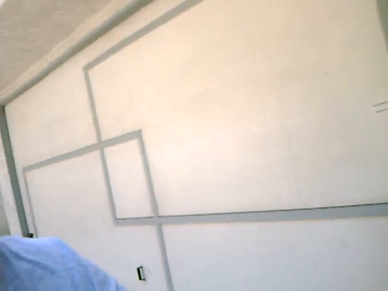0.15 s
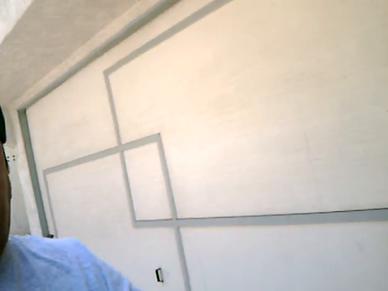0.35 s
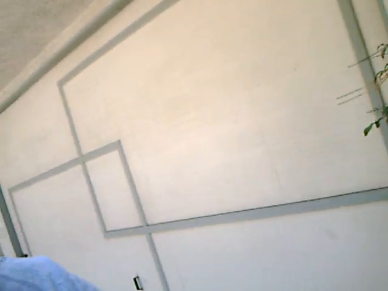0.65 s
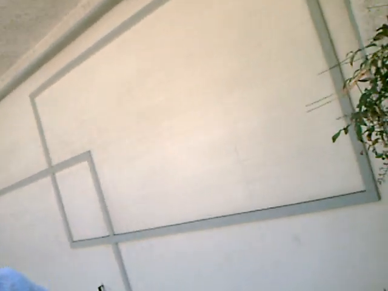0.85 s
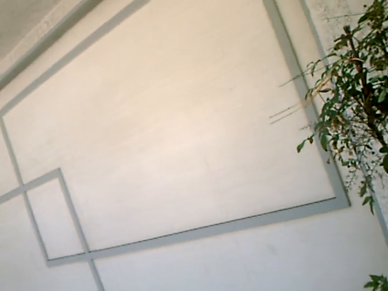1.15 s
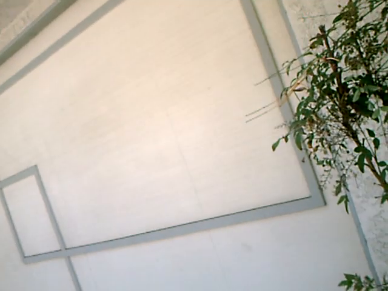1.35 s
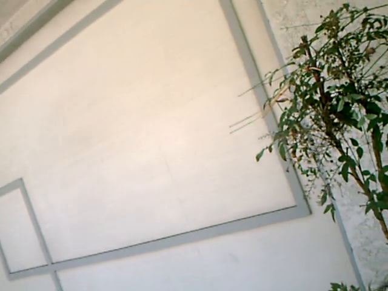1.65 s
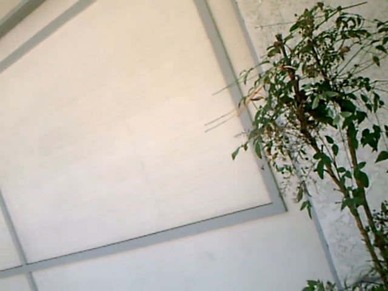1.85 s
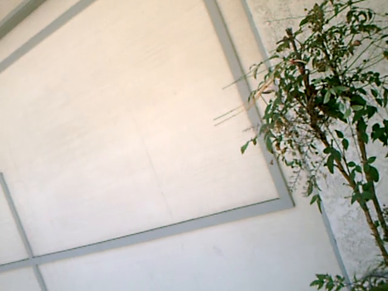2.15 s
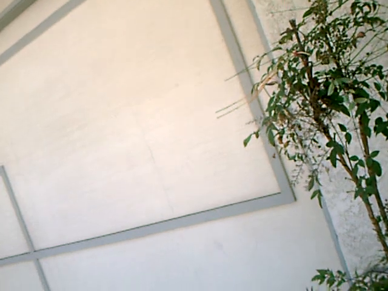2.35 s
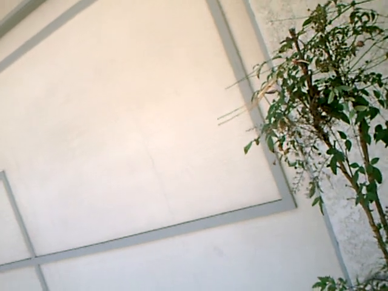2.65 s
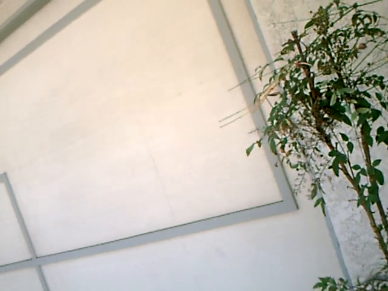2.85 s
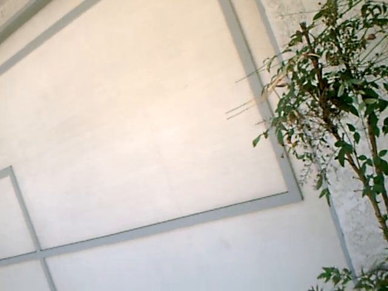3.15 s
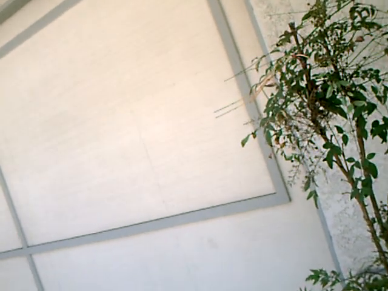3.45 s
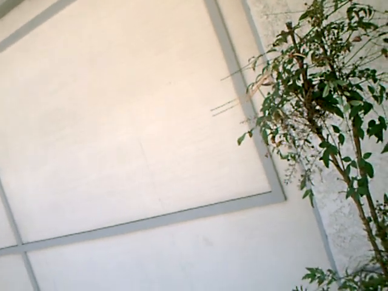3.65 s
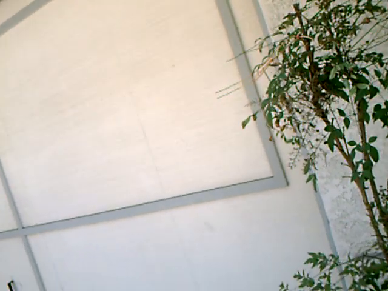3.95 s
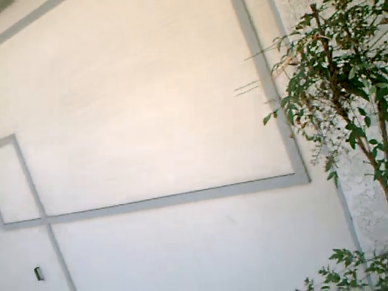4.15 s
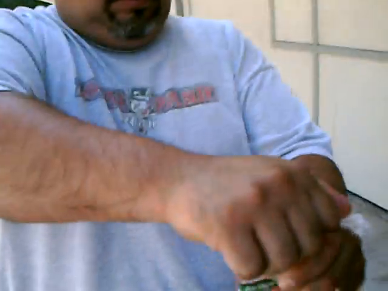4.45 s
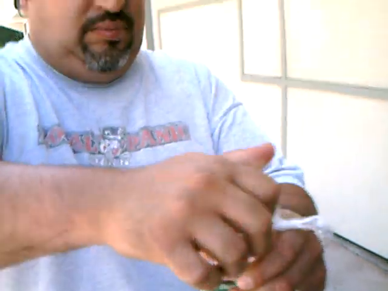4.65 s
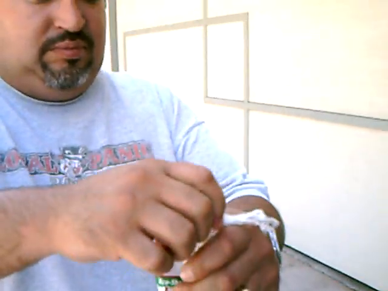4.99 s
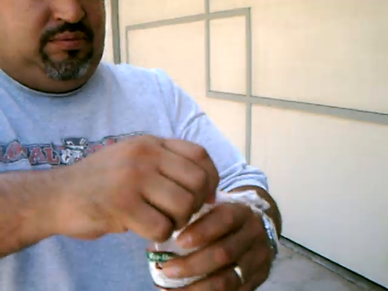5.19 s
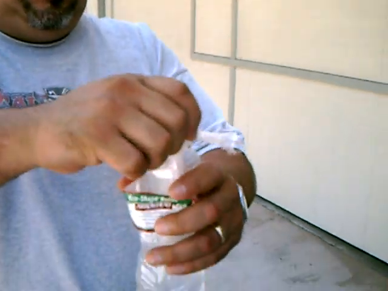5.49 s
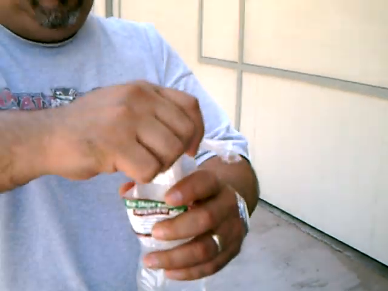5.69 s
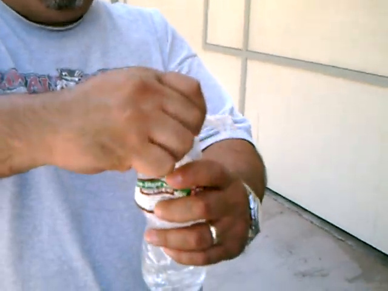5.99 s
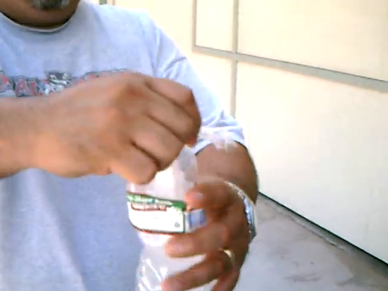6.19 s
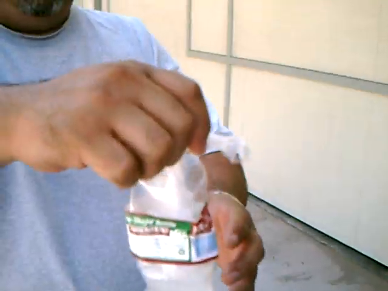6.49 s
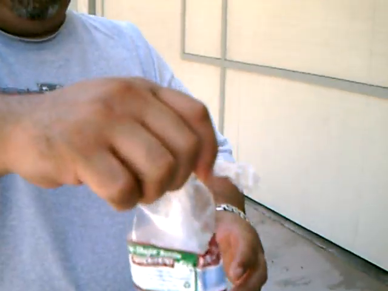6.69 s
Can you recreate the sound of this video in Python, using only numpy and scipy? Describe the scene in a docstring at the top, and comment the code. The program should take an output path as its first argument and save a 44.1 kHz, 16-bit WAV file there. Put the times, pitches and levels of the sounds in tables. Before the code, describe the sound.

Outdoors, over a steady low rumble, a thin plastic water bottle gives a hollow pop almost at once, close to the microphone. Hands squeeze it and twist the cap over plastic wrap, making irregular clusters of pops and bright snaps, some ringing briefly, while the wrap rubs faintly. The snaps thin out later, with pauses between them. Nearby walls add a short echo, and the loudest snaps overload the small microphone.

```python
"""A low outdoor rumble, and almost at once the hollow pop of a thin plastic water bottle, close to the
microphone. The bottle is squeezed and twisted shut over plastic wrap: wall panels buckle, creases snap
brightly, short tones ring on after a snap or knock, and the wrap rubs under the fingers. The ground and
a house front echo each snap, and the loudest snaps overload the small camera's microphone."""
import sys
import numpy as np
from scipy import signal
from scipy.fft import rfft, irfft
from scipy.io import wavfile
from scipy.ndimage import uniform_filter1d

SR = 44100
rng = np.random.default_rng(int(sys.argv[2]) if len(sys.argv) > 2 else 0)


def to_wav(s):
    """Save 16-bit WAV."""
    ch = np.atleast_2d(s).T  # columns
    pcm = np.round(np.clip(ch, -1, 1) * 32767)  # PCM
    wavfile.write(sys.argv[1], SR, pcm.astype(np.int16))


N = 301203
TIME = np.arange(N) / SR
SNAP_TIME = TIME[:1024]


def undb(db):
    """Decibels to gain."""
    return 10 ** (np.asarray(db) / 20)


def level(x, db):
    """Scale to an rms level."""
    return x * undb(db) / np.sqrt(np.mean(x ** 2))


def burst_level(x, db):
    """Scale a short sound so that its energy equals 1 ms at this level."""
    return x * undb(db) * np.sqrt(SR / 1000 / np.sum(x ** 2))


def add(out, start_s, x):
    """Mix x into out from start_s on."""
    i = max(int(start_s * SR), 0)
    out[i:i + len(x)] += x[:len(out) - i]


def butter(order, hz, kind="low"):
    """Sections of a Butterworth filter."""
    return signal.butter(order, hz, kind, fs=SR, output="sos")


def resonate(x, hz, width_hz):
    """One resonance, gain 1 at its centre."""
    return signal.lfilter(*signal.iirpeak(hz, hz / width_hz, fs=SR), x)


def colour(x, points):
    """Shape a sound by a spectrum of (Hz, dB) points."""
    hz, db = np.transpose(points)
    bin_hz = np.arange(len(x) // 2 + 1) * SR / len(x)
    gain = undb(np.interp(np.log(bin_hz + 1), np.log(hz), db))
    return irfft(rfft(x) * gain, len(x))


def drift(rate_hz):
    """Smooth random wandering with an rms of 1."""
    hold = int(SR / rate_hz)
    steps = np.repeat(rng.standard_normal(N // hold + 1), hold)[:N]
    return level(uniform_filter1d(uniform_filter1d(steps, hold), hold), 0)


# The open air around the microphone. Each row: frequency in Hz, relative level in dB.
AIR_SPECTRUM = [(13, -37), (22, -10), (38, -3), (58, 0.5), (86, -7.5), (109, -7), (151, -15), (199, -14.5),
                (257, -19.5), (295, -19.5), (480, -29), (940, -27.5), (1930, -42.5), (5100, -43),
                (5600, -48), (7280, -77), (12300, -120)]
# The background rises and sinks. Each row: time in seconds, rumble gain in dB, distant hiss gain in dB.
AIR_SWELL = [(0, 4, 2.5), (.7, 0, 3), (2, 0, .3), (5, -.5, 0), (6.2, -0.5, 2), (6.83, -1, -.5)]
# Drones within the rumble. Each row: centre in Hz, nominal width in Hz, level in dB before the swell.
DRONE_BANDS = [(58.9, 6.5, -46), (126.3, 13, -52.5), (200.4, 22, -55)]


def outdoor_air(air_db=-36, rumble_db=-1.32, waver_db=0.3, split_hz=300):
    """Low rumble with a few droning bands, under a smooth distant hiss."""
    times, *gains_db = np.transpose(AIR_SWELL)
    rumble_swell_db, hiss_swell_db = (np.interp(TIME, times, db) for db in gains_db)
    air = level(colour(rng.standard_normal(N), AIR_SPECTRUM), air_db)
    low = signal.sosfiltfilt(butter(2, split_hz), air)
    drone = np.zeros(N)
    for hz, width_hz, db in DRONE_BANDS:
        band = resonate(rng.standard_normal(N), hz, 2 * width_hz)
        drone += level(resonate(band, hz, 2 * width_hz), db)
    rumble = (low * undb(rumble_db) + drone) * undb(rumble_swell_db + waver_db * drift(4.3))
    rumble = signal.sosfilt(butter(3, 32, "high"), rumble)
    return rumble + (air - low) * undb(hiss_swell_db)


def ring(hz, rise_s, decay_s):
    """A damped mode that builds up while the plastic gives way."""
    t = SNAP_TIME
    return np.sin(2 * np.pi * hz * t) * (1 - np.exp(-(t / rise_s) ** 2)) * np.exp(-t / decay_s)


def fracture(rise_s, decay_s):
    """A flurry of tiny slips that builds up and dies away within a few milliseconds."""
    t = SNAP_TIME
    return rng.standard_normal(len(t)) * (1 - np.exp(-(t / rise_s) ** 2)) * np.exp(-t / decay_s)


def panel_pop(hz, cycles=1.4, overtone_ratio=1.365, overtone_db=-10):
    """A wall panel flips through and rings for a few cycles; the grip damps each one differently."""
    grip, shape = rng.standard_normal(2)
    fundamental = ring(hz, rise_s=0.4 / hz, decay_s=cycles * np.exp(0.092 * grip) / hz)
    overtone = ring(hz * overtone_ratio * np.exp(0.089 * shape), rise_s=0.00041, decay_s=0.003)
    modes = burst_level(fundamental, 0) + burst_level(overtone, overtone_db)
    # a small panel radiates little bass, and the hand mutes its higher modes
    return signal.sosfilt(butter(4, [0.667 * hz, 1800], "band"), modes)


def recoil(panel_hz, pop_db, crack_db, middling_panel_hz=1053):
    """The whole bottle thumps, harder after a strong buckle and after a large, low panel."""
    octaves_up = np.log2(panel_hz / middling_panel_hz)
    thump_db = -15 + .3 * pop_db + .5 * crack_db - 14 * octaves_up
    return burst_level(ring(0.376 * panel_hz, rise_s=0.00096, decay_s=0.0015), thump_db)


# The colour of cracking plastic, close up. Each row: frequency in Hz, gain in dB.
CRACK_SPECTRUM = [(150, -21), (400, -0.5), (750, 6), (1600, 6), (2000, 2.5), (2500, 4.5), (3400, -3.5),
                  (4300, -12.5), (5500, -30)]


def crack():
    """A crack runs through the plastic in one short burst of slips."""
    slips = fracture(rise_s=.0003, decay_s=.0012)
    return colour(np.roll(slips, 16), CRACK_SPECTRUM)


def crease(hz, grit_db=1, grit_width_hz=2700):
    """A crease swells and dies in about two milliseconds: a bright ring with grit around it."""
    tone = ring(hz, rise_s=.0012, decay_s=.00042)
    grit = fracture(rise_s=0.00093, decay_s=0.00091)
    for _ in range(2):
        grit = resonate(grit, 0.97 * hz, grit_width_hz)
    return burst_level(tone, 0) + burst_level(grit, grit_db)


# The creases change pitch as the grip changes. Each row: time in seconds, pitch in Hz.
CREASE_TUNING = [(0, 4340), (.7, 4730), (1.6, 4720), (2.05, 4920), (2.7, 4870), (3.13, 4410), (4.58, 4330),
                 (6.02, 3834), (6.18, 4770)]


def snap(time_s, panel_hz, pop_db, crack_db, crease_db):
    """The sound of a buckle: the panel pops, the bottle recoils, the crease cracks and rings high."""
    crease_hz = np.interp(time_s, *np.transpose(CREASE_TUNING))
    bright = burst_level(crack(), crack_db) + burst_level(crease(crease_hz), crease_db)
    bright = signal.sosfilt(butter(6, 1.207 * crease_hz), bright)  # a blunt crease has no top
    pop = burst_level(panel_pop(panel_hz), pop_db)
    return pop + recoil(panel_hz, pop_db, crack_db) + bright


# Pops and snaps of the bottle wall, close to the microphone, with a few faint echoes just after loud
# ones. Each row: time in seconds, panel pitch in Hz, then pop, crack and crease levels in dB
# (energy over 1 ms, the last two before their top is dulled).
BOTTLE_SNAPS = [(0.0438, 750, -3.5, -15.5, -11.5), (.0477, 1140, -15.5, -23, -23),
                (0.0755, 630, -34, -48, -61), (0.1254, 828, -8, -17, -16), (0.138, 1110, -21.5, -18, -16.5),
                (0.1503, 1184, -19.5, -14.5, -16), (.2965, 1160, -4.5, -12.5, -9),
                (0.33, 1270, -24, -24, -41), (.373, 1170, -22.5, -37, -27.5), (.57, 970, -20, -21.5, -20),
                (0.6651, 1005, -21, -32, -37), (0.675, 820, -31, -33, -40),
                (0.7086, 1020, -32.5, -33.5, -31), (0.7176, 1000, -29.5, -35.5, -20),
                (0.7347, 1110, -30.5, -16.5, -9), (0.7478, 1150, -19.5, -20, -14.5),
                (0.767, 1072, -22, -24, -10), (0.7886, 925, -6, -16, -26),
                (1.0643, 1063, -16.5, -24.5, -12.5), (1.1152, 1110, -28.5, -29, -11.5),
                (1.1697, 925, -16.5, -40, -57), (1.1839, 1050, -22.5, -42, -39),
                (1.1917, 1080, -19, -17, -18), (1.1968, 957, -10, -31, -18.5),
                (1.2495, 1170, -16, -28, -19), (1.3023, 1410, -37.5, -34, -27.5),
                (1.3156, 1130, -18.5, -32, -19.5), (1.322, 1570, -23, -22, -17),
                (1.3528, 1290, -13, -20, -24), (1.4077, 950, -30, -47.5, -48),
                (1.4972, 1020, -30, -49, -47), (1.509, 1030, -19, -28, -24.5),
                (1.5198, 1240, -26, -41.5, -44), (1.5844, 1090, -9.5, -21, -27.5),
                (1.5985, 1150, -23, -17, -29), (1.6041, 1190, -30, -27, -10),
                (1.6053, 1197, -27, -19.5, -7), (1.8747, 1220, -28, -28, -27), (1.9911, 980, -37, -45, -30),
                (2.001, 1115, -34, -33.5, -33), (2.0087, 960, -32, -44, -44.5),
                (2.0225, 1270, -42, -44.5, -29), (2.0481, 1230, -34, -32.5, -17),
                (2.076, 1070, -31.5, -37.5, -50), (2.1248, 1110, -21.5, -34, -55),
                (2.3027, 1260, -21, -39, -34), (2.3431, 870, -27.5, -35.5, -45),
                (2.6762, 1340, -28, -26, -19.5), (2.7105, 1370, -20.5, -37, -41),
                (2.7995, 1100, -28.5, -41, -46), (2.8349, 1026, -18.5, -45, -39.5),
                (3.091, 885, -29, -32, -32.5), (3.121, 1160, -28, -37, -28),
                (3.1303, 1240, -17.5, -11, -6.5), (3.136, 1160, -21, -18.5, -24),
                (3.1504, 1090, -19, -19.5, -16), (3.164, 1060, -29, -38, -40),
                (3.8196, 1020, -18.5, -34.5, -31), (4.4984, 1030, -17, -30, -29),
                (4.5041, 1585, -18.2, -33, -43.5), (4.5298, 1000, -25.5, -48, -48.5),
                (4.5756, 1305, -16.5, -13.5, -17.5), (4.5777, 1170, -18.5, -31, -19),
                (4.6009, 954, -3.5, -26, -30), (5.9396, 935, -11.5, -21, -18), (5.9677, 874, -27, -55, -55),
                (6.0242, 955, -15, -20.5, -24.5), (6.054, 900, -25, -48, -51),
                (6.1284, 1030, -20, -39, -43), (6.1784, 1103, -23.5, -32, -25.5)]


def squeezed_bottle(lead_s=.0007):
    """The wall's snaps and a few faint echoes of them; each begins just before its peak."""
    out = np.zeros(N)
    for time_s, panel_hz, *levels_db in BOTTLE_SNAPS:
        add(out, time_s - lead_s, snap(time_s, panel_hz, *levels_db))
    return out


# Short tones that ring on after a snap or knock, just as close.
# Each row: start in seconds, pitch in Hz, starting level in dB.
RINGING_TONES = [(.044, 236, -24), (.075, 317, -28), (.126, 368, -27), (.298, 2330, -22),
                 (.568, 182.6, -31), (2.611, 640, -34), (2.712, 581, -28.5), (2.836, 1163, -26),
                 (3.131, 760, -20), (3.15, 572, -25), (6.025, 345, -32), (6.128, 2380, -27)]
# Low resonances that linger after these tones. Each row: centre in Hz, width in Hz, gain in dB.
HOLLOW_MODES = [(277, 4.3, 16), (400, 8.5, 8.5)]


def ringing(cycles_to_fade=40):
    """Each tone falls 60 dB in the same number of cycles and wakes the hollow modes."""
    tones, t = np.zeros(N), TIME[:SR]
    for start_s, hz, db in RINGING_TONES:
        cycles = hz * t
        envelope = (1 - np.exp(-cycles)) * undb(db - 60 * cycles / cycles_to_fade)
        add(tones, start_s, np.sin(2 * np.pi * cycles) * envelope)
    return tones + sum(undb(db) * resonate(tones, hz, width_hz) for hz, width_hz, db in HOLLOW_MODES)


# Ground and walls, a few metres off at most. Each row: delay in seconds, gain in dB.
YARD_ECHOES = [(.0061, -15.5), (0.0112, -22.5), (.0285, -40), (0.0354, -27.5)]
# The colour of the yard's tail at the microphone. Each row: frequency in Hz, gain in dB.
YARD_SPECTRUM = [(100, -10.5), (250, 6.5), (500, 5), (900, -3), (1400, 2.5), (2400, -1.5), (3600, -8.5),
                 (4300, -2), (4800, -3.5), (5300, -2.5), (5900, -4)]


def yard(x, low_t60_s=0.61, treble_t60_s=0.9, build_s=0.013, scatter_s=0.00345, sway=.06):
    """Single echoes, scatter from hands and body, and a tail between the walls whose treble lingers."""
    echoes = np.zeros(N)
    for delay_s, db in YARD_ECHOES:
        path_s = delay_s * (1 + sway * drift(2))  # the bottle moves about in the hands
        delayed_index = np.arange(N) - (path_s * SR).astype(int)
        echoes += undb(db) * x[np.clip(delayed_index, 0, N - 1)]
    t = TIME[:SR]
    noise = rng.standard_normal(SR)
    low = signal.sosfiltfilt(butter(2, 2000), noise)
    tail = low * undb(-60 * t / low_t60_s) + (noise - low) * undb(-60 * t / treble_t60_s)
    tail *= 1 - np.exp(-t / build_s)
    tail = colour(level(tail, db=-17.5), YARD_SPECTRUM)
    scatter = level(rng.standard_normal(SR) * t * np.exp(-t / scatter_s), db=-22)
    return echoes + signal.fftconvolve(x, (tail + scatter) / np.sqrt(SR))[:N]


def crinkles(strong_db=-22, weaker_db=-20, spread_db=2, spread_s=.016, middling_panel_hz=1053):
    """A strong buckle strains a neighbouring panel, which gives way faintly just after it."""
    out = np.zeros(N)
    chances = rng.standard_normal((len(BOTTLE_SNAPS), 3))
    for (time_s, _, *levels_db), (lag, size, pitch) in zip(BOTTLE_SNAPS, chances):
        if max(levels_db) > strong_db:
            faint_db = np.minimum(levels_db, -14) + weaker_db + spread_db * size
            panel_hz = middling_panel_hz * np.exp(.2 * np.tanh(pitch))
            add(out, time_s + spread_s * abs(lag), snap(time_s, panel_hz, *faint_db))
    return out


# Wrap sliding under the fingers, faint even this close. Each row: start in seconds, length in seconds,
# hiss centre in Hz, width in Hz, then hiss and bottle levels in dB before the fades and treble cut.
WRAP_RUBS = [(0.528, 0.098, 4200, 910, -51, -51.5), (1.265, 0.19, 4580, 1200, -52.5, -52.5),
             (1.957, 0.42, 4830, 794, -54.5, -66.5), (2.279, 0.47, 4850, 790, -59.5, -63.5),
             (2.905, 0.034, 4000, 1910, -48, -43.5), (2.933, 0.076, 4020, 1280, -45, -48),
             (3.14, 0.14, 3900, 2190, -48, -49), (4.408, 0.17, 4300, 1410, -55.5, -55.5)]


def wrap(flutter_db=2, slip_chance=.08, top_hz=5350):
    """Film sticks and slips on the cap: dense tiny grains that hiss and faintly shake the bottle."""
    out = np.zeros(N)
    for start_s, length_s, hz, width_hz, hiss_db, body_db in WRAP_RUBS:
        n = int(length_s * SR)
        grip = undb(flutter_db * drift(150)[:n])
        slips = rng.standard_normal(n) * grip * (rng.random(n) < slip_chance)
        hiss_band = butter(2, [hz - width_hz / 2, hz + width_hz / 2], "band")
        hiss = level(signal.sosfilt(hiss_band, slips), hiss_db)
        body = level(signal.sosfilt(butter(2, [400, 2000], "band"), slips), body_db)
        add(out, start_s, (hiss + body) * signal.windows.tukey(n, .5))
    return signal.sosfilt(butter(8, top_hz), out)


def scene():
    """Bottle and wrap close up, with the yard and the open air behind them, in mono."""
    plastic = squeezed_bottle() + wrap() + crinkles()
    return (plastic + ringing() + yard(plastic) + outdoor_air())[None]


def record(dry, mic_hz=5850, overload=.74, top_hz=15700):
    """A small narrow-band microphone that flattens the highest peaks."""
    narrow = signal.sosfiltfilt(butter(14, mic_hz), dry)
    clipped = np.clip(narrow, -overload, overload)
    return signal.sosfilt(signal.ellip(8, .2, 70, top_hz, fs=SR, output="sos"), clipped)


dry = scene()
out = record(dry)
to_wav(out)
```